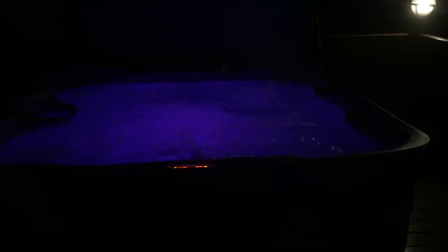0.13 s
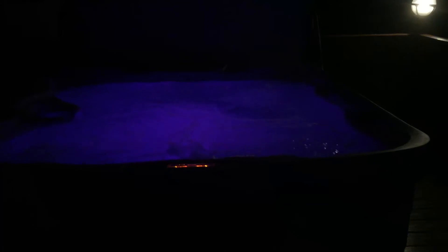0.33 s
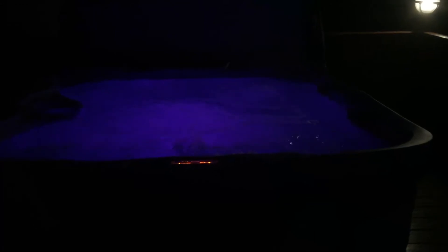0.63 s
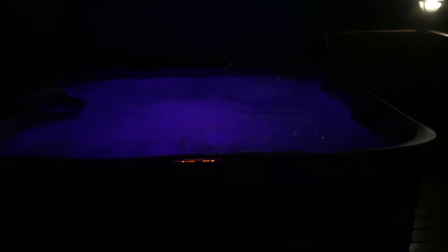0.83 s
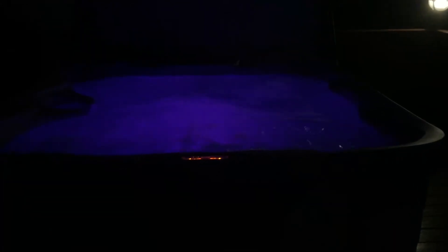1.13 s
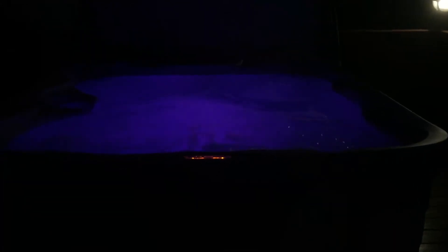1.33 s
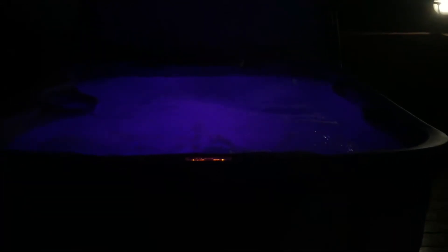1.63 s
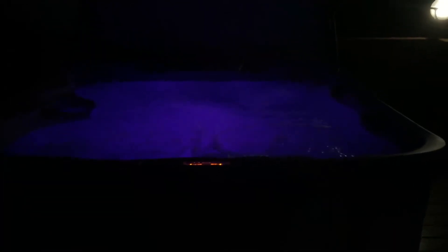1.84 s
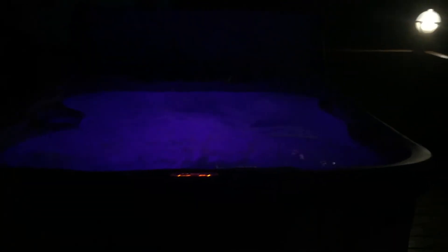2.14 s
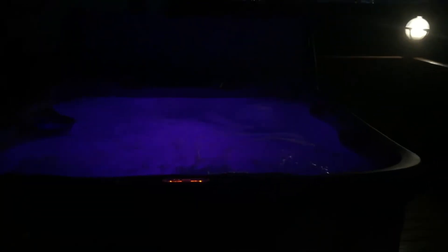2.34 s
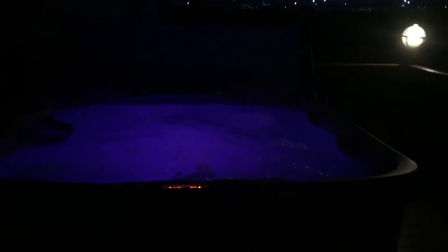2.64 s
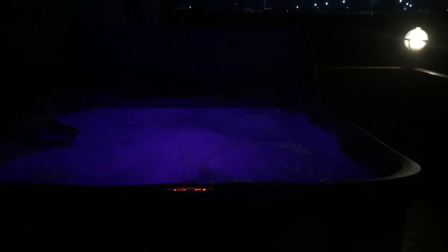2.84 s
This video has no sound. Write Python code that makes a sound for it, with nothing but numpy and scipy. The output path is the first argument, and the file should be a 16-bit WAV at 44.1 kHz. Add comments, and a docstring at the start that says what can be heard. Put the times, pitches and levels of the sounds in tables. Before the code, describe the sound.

Steady bubbling hot tub, close single-channel pickup at night: low wavering motor hum under churning, gurgling water and hissing foam, spray pattering irregularly, and one sharp drop tick near the end.

```python
"""A hot tub runs outdoors at night, heard from beside its rim. After a short silence it cuts in at once:
the pump's hum (wobbling tones), rumbling water and rushing jets (coloured noise), bubbles and fizzing
foam (many damped sines). Soon big gulps of air (low swells) heave the surface and spray patters back
(short noise bursts). From half a second on, tiny bubbles ring now and then (narrow noise bursts).
Near the end one drop ticks sharply close by (a click and a very short ring)."""
import sys
import numpy as np
from scipy import signal
from scipy.fft import rfft, irfft
from scipy.io import wavfile

SR = 44100
rng = np.random.default_rng(int(sys.argv[2]) if len(sys.argv) > 2 else 0)


def put_to_file(sound):
    """Save the sound as 16-bit audio at rate SR, in the file named by the first command-line argument."""
    columns = np.atleast_2d(sound).T  # one column per channel
    safe = np.clip(columns, -1, 1)
    whole_steps = np.round(safe * 32767)
    wavfile.write(sys.argv[1], SR, whole_steps.astype(np.int16))


N = 132300  # length in samples: 3 seconds
TIME = np.arange(N) / SR  # seconds
BINS_HZ = np.arange(N // 2 + 1) * SR / N  # frequencies of the spectrum


def undb(db):
    """Turn decibels into a gain to multiply by."""
    return 10 ** (np.asarray(db) / 20)


def level(x, db):
    """Set the average (rms) level over the whole length, in dB."""
    return x * undb(db) / np.sqrt(np.mean(x ** 2))


def colour(x, points):
    """Filter a sound by a curve of (Hz, dB) points, joined by straight lines over log frequency."""
    hz, db = np.array(points, float).T
    curve_db = np.interp(np.log(np.maximum(BINS_HZ, 1)), np.log(hz), db)
    return irfft(rfft(x) * undb(curve_db), N)


def ring(hz, width_hz):
    """A resonance driven by turbulence: noise in a narrow band around one pitch, rms 1."""
    off = (BINS_HZ - hz) / width_hz
    spectrum = rfft(rng.standard_normal(N)) / (1 + 2 * off ** 2)
    return level(irfft(spectrum, N), 0)


def walk(rate):
    """A slow random wander with spread 1; a higher rate (Hz) wanders faster."""
    return ring(0, rate)


def grains(per_s, low_hz, high_hz, cycles, rise, spread_db):
    """Bubbles at random times: damped sines that glide up, most of them weak and a few strong."""
    out = np.zeros(N)
    for when, size, strength in rng.random((int(per_s * N / SR), 3)):
        hz = low_hz * (high_hz / low_hz) ** size
        start = int(when * N)
        length = min(int(cycles * SR / hz) + 2, N - start)
        age = np.arange(length) * hz / SR / cycles  # runs from 0 to about 1
        gain = undb(spread_db * min(-np.log(1 - strength), 5.5))
        gain *= np.sqrt(hz)  # high bubbles are shorter, so this evens out the energy
        fade = np.exp(-np.log(1000) * age)  # down 60 dB at age 1
        tone = np.sin(2 * np.pi * cycles * age * (1 + rise * age / 2))
        out[start:start + length] += gain * fade * tone
    return out


def burst(start_s, attack_s, decay_s):
    """An envelope with a straight attack and an exponential decay."""
    age = TIME - start_s
    return np.clip(age / attack_s, 0, 1) * np.exp(-np.maximum(age - attack_s, 0) / decay_s)


HUM_HZ = 100.16  # lowest partial: twice the mains rate
HUM_WOBBLE = 0.053  # typical phase wobble of each partial, in cycles
HUM_BASS_GAIN_DB, HUM_THIRD_GAIN_DB = 0.5, 0.5  # added to the two level curves below
# How the hum's lowest partial swells and dips.
# Each row: time in seconds, level in dB before its gain.
HUM_BASS_CURVE = [(0.15, -52), (0.19, -36.5), (0.33, -42), (0.36, -51), (0.49, -39.5), (1.04, -41),
                  (1.1, -36.5), (1.24, -47.5), (1.39, -35), (1.42, -39.5), (2.29, -40.5), (2.4, -54),
                  (2.43, -42), (2.57, -40.5), (2.63, -49.5), (2.88, -37.5), (2.93, -52), (3.0, -38.5)]
# How the hum's third partial swells and dips.
# Each row: time in seconds, level in dB before its gain.
HUM_THIRD_CURVE = [(0.15, -40.5), (0.3, -45), (0.42, -38), (0.94, -43), (0.97, -37), (1.18, -43),
                   (1.22, -37.5), (1.36, -39), (1.39, -50), (1.48, -37), (1.59, -44.5), (1.67, -36),
                   (1.77, -47), (1.81, -42.5), (2.84, -40), (2.86, -56), (2.92, -36.5), (3.0, -40.5)]
# Even partials of the hum.
# Each row: multiple of the hum's pitch, level of the tone in dB, flutter as a share of the tone.
HUM_EVEN = [(2, -40, 0.15), (4, -55, 0.35)]
# Narrow rings of pump and pipes.
# Each row: pitch in Hz, width in Hz, level in dB.
PIPE_RINGS = [(342, 13, -51), (580.5, 1.65, -54.5), (965, 32, -57), (1178, 18, -61.5), (1232, 7.1, -63),
              (2150, 220, -70.5), (2600, 48, -53.5), (3366, 40, -74)]


def hum_tone(multiple):
    """One partial of the hum, rms 1, whose phase wanders a little."""
    cycles = multiple * HUM_HZ * TIME + rng.random() + HUM_WOBBLE * walk(rate=3.4)
    return np.sqrt(2) * np.cos(2 * np.pi * cycles)


def swell(curve, gain_db):
    """Follow a level curve over time."""
    seconds, db = np.array(curve).T
    return undb(np.interp(TIME, seconds, db) + gain_db)


def pump():
    """A hum whose partials wobble, two of them swelling and dipping, and narrow rings of the pipework."""
    out = swell(HUM_BASS_CURVE, HUM_BASS_GAIN_DB) * hum_tone(1)
    out += swell(HUM_THIRD_CURVE, HUM_THIRD_GAIN_DB) * hum_tone(3)
    for multiple, db, flutter in HUM_EVEN:
        out += undb(db) * (hum_tone(multiple) + flutter * ring(multiple * HUM_HZ, width_hz=6.8))
    for hz, width_hz, db in PIPE_RINGS:
        out += undb(db) * ring(hz, width_hz)
    return out


CHURN_DB, CHURN_SWING_DB = -40, 0.5  # rumble level, typical surge
GULP_S = 0.022  # spread of each gulp's bell-shaped swell, in seconds
# Tone of the churning water.
# Each row: frequency in Hz, relative strength in dB per Hz.
CHURN_COLOUR = [(20, -42), (31, -31), (43, -5), (62, 2.5), (76, -3.5), (95, -1.5), (125, -1), (175, 1),
                (235, -2), (310, -1), (400, -9), (600, -15.5), (1200, -36.5)]
# Big gulps of air that heave the surface.
# Each row: middle in seconds, pitch in Hz, height of the swell in dB.
AIR_GULPS = [(0.199, 81, -34), (1.34, 60, -36.5), (1.458, 58, -37), (1.69, 62, -42), (1.909, 62, -41),
             (2.322, 61, -37), (2.55, 55, -50), (2.66, 57.5, -39), (2.87, 52, -41)]


def churn():
    """The surging rumble of the water is low noise; each big gulp of air is a brief low tone."""
    rumble = colour(rng.standard_normal(N), CHURN_COLOUR)
    out = level(rumble * undb(CHURN_SWING_DB * walk(rate=3.6)), CHURN_DB)
    for middle_s, hz, db in AIR_GULPS:
        age = TIME - middle_s
        bell = np.exp(-(age / GULP_S) ** 2 / 2)
        out += undb(db) * bell * np.sin(2 * np.pi * hz * age)
    return out


RUSH_DB, RUSH_SWING_DB = -42.5, 0.56  # rush level, typical flicker
BUBBLE_DB, GURGLE_DB = -49, -52
# Tone of the rushing jets and their small bubbles.
# Each row: frequency in Hz, relative strength in dB per Hz.
RUSH_COLOUR = [(200, -23), (450, 3.5), (700, 0.5), (1350, -2), (2050, 0), (2400, -2.5), (2800, -3.5),
               (3100, -10), (4600, -9.5), (4950, -13), (5900, -10), (7600, -16.5), (8400, -13), (9700, -21),
               (10350, -22), (11100, -20.5), (12300, -17.5), (14000, -25), (16000, -58)]


def jets():
    """Aerated water rushes, thick with small bubbles; fewer large ones ring longer and gurgle."""
    rush = colour(rng.standard_normal(N), RUSH_COLOUR) * undb(RUSH_SWING_DB * walk(rate=59))
    bubbles = grains(per_s=600, low_hz=389, high_hz=4600, cycles=16.3, rise=0.069, spread_db=2.0)
    bubbles = colour(bubbles, RUSH_COLOUR)
    gurgles = grains(per_s=150, low_hz=456, high_hz=2450, cycles=35, rise=0.12, spread_db=2.8)
    return level(rush, RUSH_DB) + level(bubbles, BUBBLE_DB) + level(gurgles, GURGLE_DB)


FOAM_DB, FOAM_SWING_DB = -53, 1.2  # fizz level before its flicker, typical flicker
PING_DECAY_S, PING_WIDTH_HZ = 0.007, 1300
# Tone of the bursting foam.
# Each row: frequency in Hz, relative strength in dB per Hz.
FOAM_COLOUR = [(800, -18), (2500, 4.5), (4500, 3), (5000, -2), (6000, 3.5), (7600, -8.5), (8500, -2.5),
               (9700, 4), (10350, -8), (11200, 5), (13500, -18), (16000, -44)]
# Tiny bubbles that ring.
# Each row: start in seconds, pitch in Hz, strength in dB before it is halved.
BUBBLE_PINGS = [(.537, 13300, -43), (1.175, 7400, -42), (1.283, 8800, -39.5), (1.703, 13200, -43),
                (2.203, 12400, -45), (2.600, 12700, -41)]


def foam():
    """Foam crackles all the time as tiny bubbles burst, and single ones ring out of it."""
    fizz = grains(per_s=3000, low_hz=2700, high_hz=15600, cycles=11, rise=0.13, spread_db=3.5)
    out = level(colour(fizz, FOAM_COLOUR), FOAM_DB) * undb(FOAM_SWING_DB * walk(rate=37))
    for start_s, hz, db in BUBBLE_PINGS:
        out += undb(db) * burst(start_s, .001, PING_DECAY_S) * ring(hz, PING_WIDTH_HZ) / 2
    return out


SPRAY_ATTACK_S, SPRAY_DECAY_S = 0.0015, 0.019
SPRAY_SKIRT_DB = -13  # how far a shower's tone has dropped one octave above its brightest pitch
# Splashes and spray that fall back.
# Each row: start in seconds, level in dB before the burst shape, brightest frequency in Hz.
SPRAY_SHOWERS = [(.22, -47, 6000), (.398, -45, 4200), (0.449, -40, 2000), (.487, -48, 12000),
                 (.517, -46, 4000), (0.711, -48, 3000), (.79, -53, 3500), (.895, -41, 905),
                 (.95, -59, 4500), (1.38, -51, 4500), (1.497, -49, 4200), (1.645, -52, 3800),
                 (1.792, -46.5, 7500), (2.102, -47, 3500), (2.395, -47, 900), (2.476, -49, 8000),
                 (2.59, -50, 4200), (2.63, -48, 4000), (2.66, -47, 1100), (2.912, -52, 9000),
                 (2.937, -44.5, 4300)]


def spray():
    """Short showers of droplets patter back onto the water: bursts of spiky noise, dull or bright."""
    patter = rng.standard_normal(N) * np.sqrt(rng.exponential(size=N))
    out = np.zeros(N)
    for start_s, db, hz in SPRAY_SHOWERS:
        far_db = 2 * SPRAY_SKIRT_DB
        tone = [(hz / 5, far_db), (hz, 0), (hz * 2, SPRAY_SKIRT_DB), (hz * 5, far_db)]
        shower = level(colour(patter, tone), 0)
        out += undb(db) * burst(start_s, SPRAY_ATTACK_S, SPRAY_DECAY_S) * shower
    return out


TICK_S, TICK_DECAY_S = 2.8575, 0.00068  # start, decay of the ring
TICK_DB = -64  # level of the snap, averaged over the whole length
TICK_RING_HZ, TICK_RING_DB = 9400, -29
# Tone of the drop's tick.
# Each row: frequency in Hz, relative strength in dB per Hz.
TICK_COLOUR = [(1500, -14), (3800, -11), (5000, 0), (7500, 3), (11500, -5), (14500, -8), (16000, -16)]


def drop():
    """One drop snaps close by, a single filtered click, and leaves a very short ring."""
    click = np.zeros(N)
    click[int(TICK_S * SR)] = 1
    snap = level(colour(click, TICK_COLOUR), TICK_DB)
    tail = burst(TICK_S, .0003, TICK_DECAY_S) * np.sin(2 * np.pi * TICK_RING_HZ * (TIME - TICK_S))
    return snap + undb(TICK_RING_DB) * tail


def scene():
    """Pump, water, foam, spray and drop together, as one channel."""
    return (pump() + churn() + jets() + foam() + spray() + drop())[None]


START_S = .12  # silence until here
TOP_HZ = 15650  # treble above this is removed


def record(dry):
    """The sound cuts in abruptly, and a steep filter cuts off the top treble."""
    opened = np.clip((TIME - START_S) / .001, 0, 1)
    top_cut = signal.ellip(10, .2, 80, TOP_HZ, fs=SR, output="sos")
    return signal.sosfilt(top_cut, dry * opened)


dry = scene()
out = record(dry)
put_to_file(out)
```